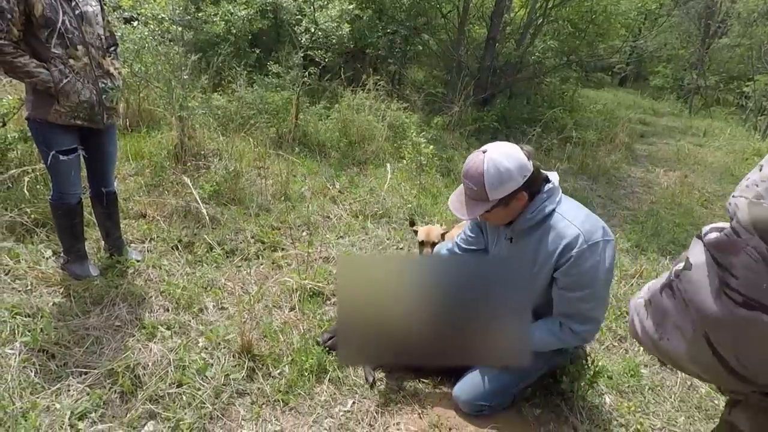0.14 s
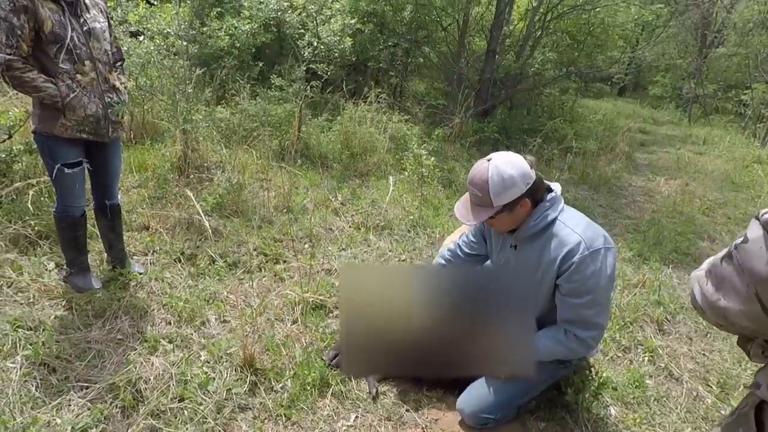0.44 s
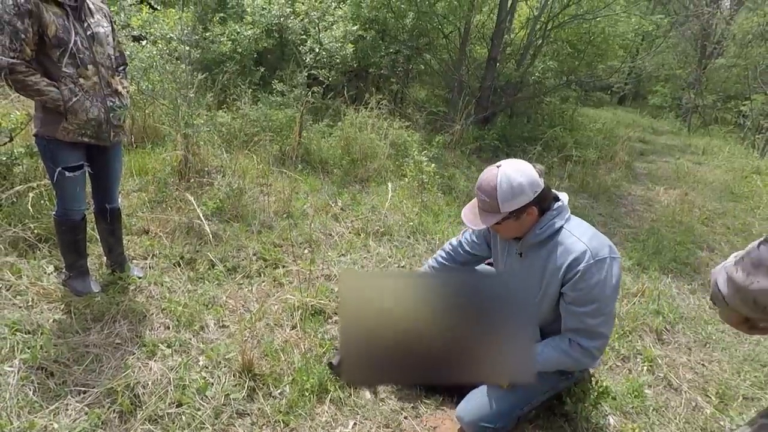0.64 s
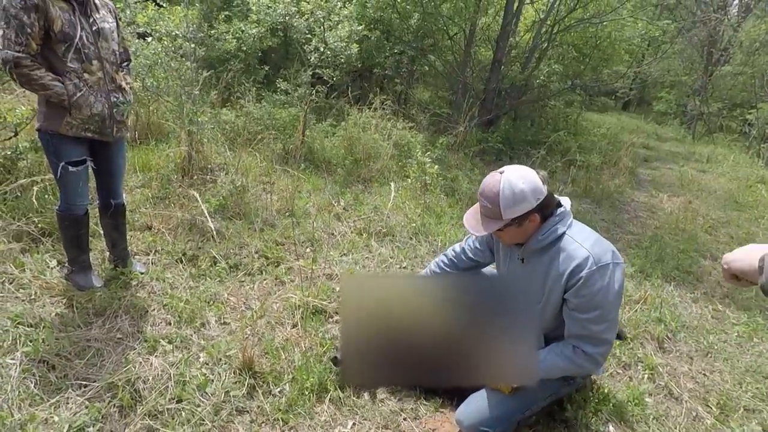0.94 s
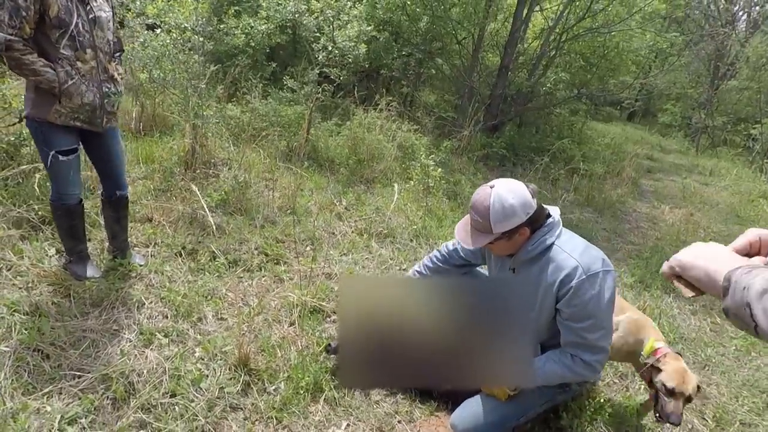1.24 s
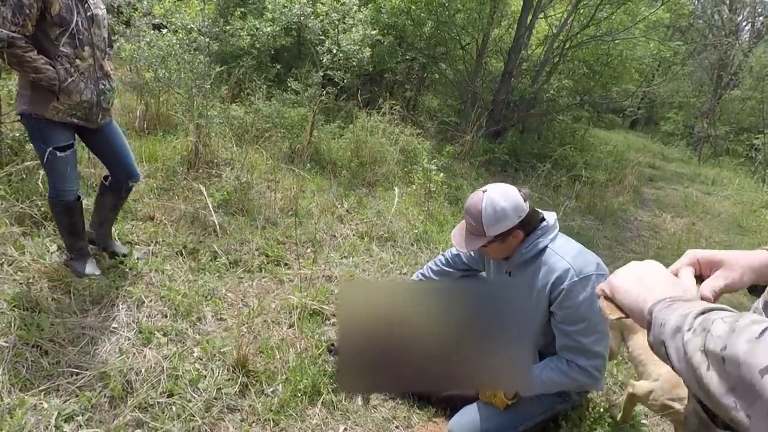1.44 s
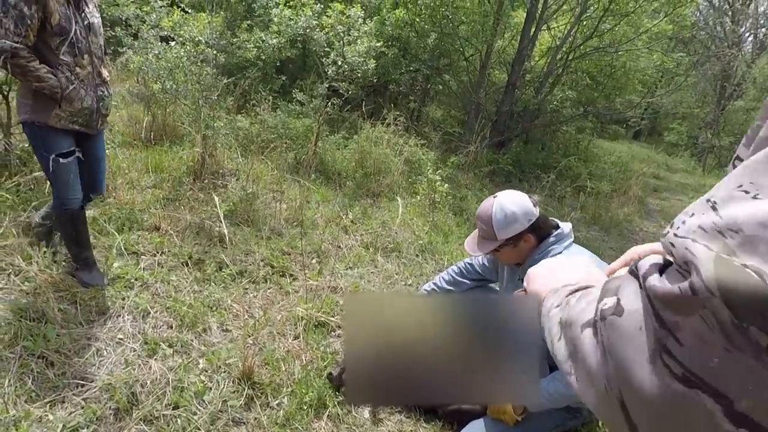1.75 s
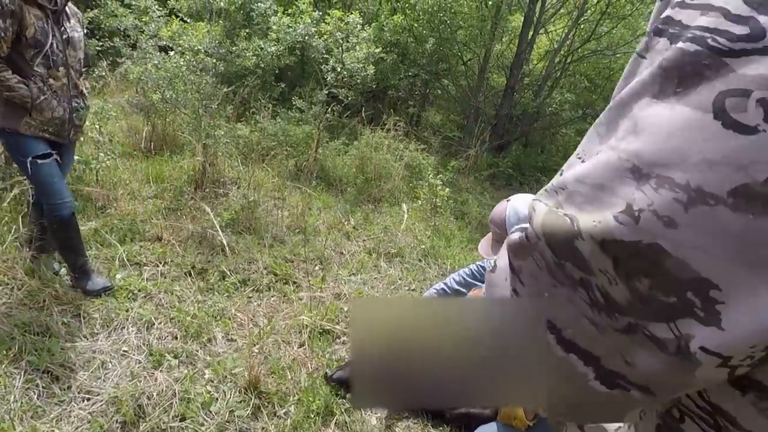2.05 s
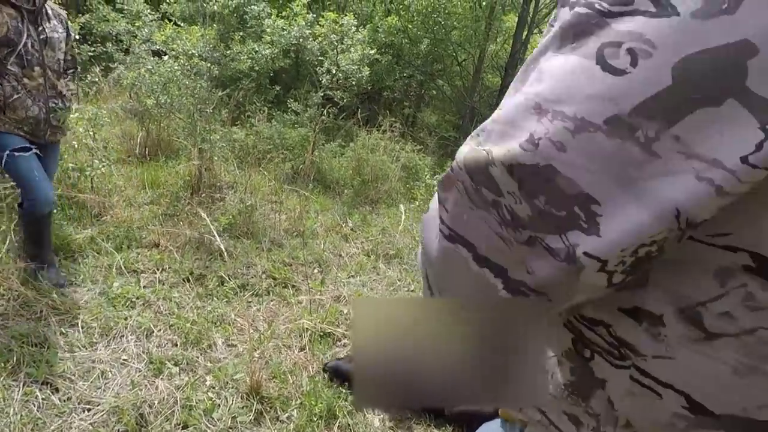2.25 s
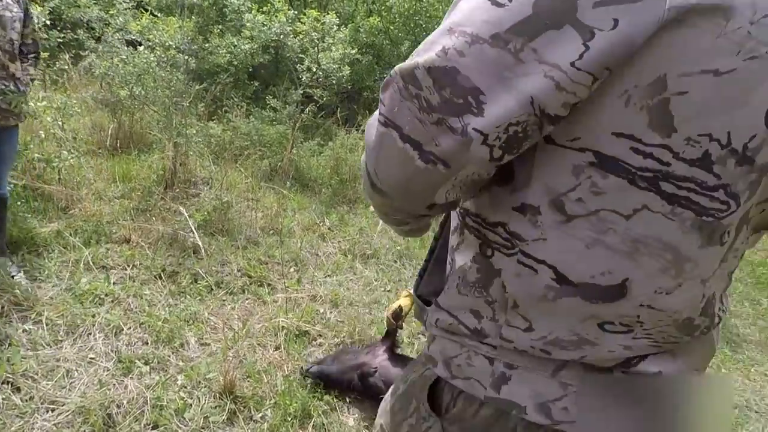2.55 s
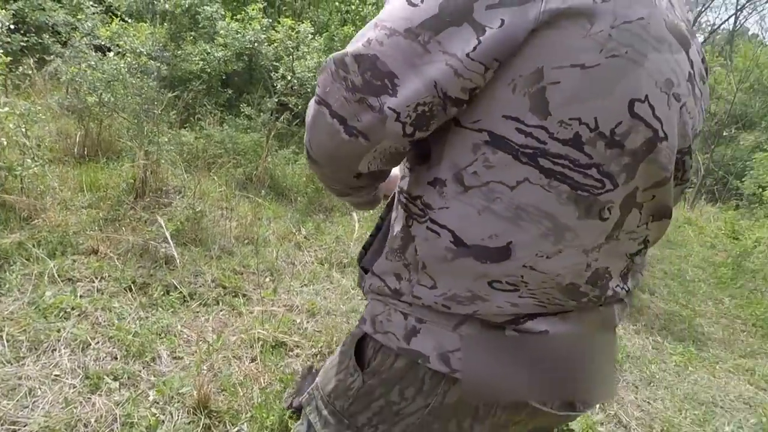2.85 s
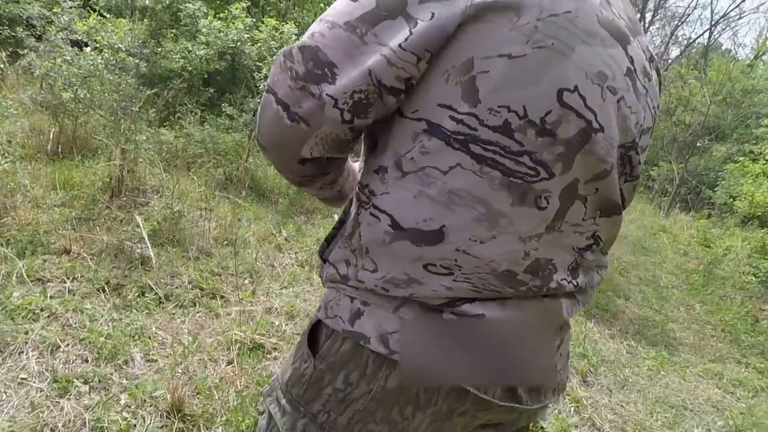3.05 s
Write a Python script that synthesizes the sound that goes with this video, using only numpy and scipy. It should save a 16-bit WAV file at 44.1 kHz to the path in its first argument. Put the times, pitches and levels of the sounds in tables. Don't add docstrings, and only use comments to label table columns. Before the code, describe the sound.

A pinned pig growls into a long, harsh, shrill squeal, then a short squeal and grunts.

```python
import sys
import numpy as np
from scipy import signal
from scipy.fft import rfft, irfft
from scipy.io import wavfile
from scipy.ndimage import uniform_filter1d

SR = 44100
rng = np.random.default_rng(int(sys.argv[2]) if len(sys.argv) > 2 else 0)


def transcribe(signal):
    frames = np.atleast_2d(signal).T
    limited = np.clip(frames, -1, 1)
    pcm = np.round(limited * 32767).astype(np.int16)
    wavfile.write(sys.argv[1], SR, pcm)


def boost(x):
    u = np.asarray(x, float) / 20
    return 10 ** u


N = 141120


def evened(x):
    return x / np.sqrt(np.mean(x ** 2) + 1e-20)


def smooth_noise(shape, size):
    return evened(uniform_filter1d(rng.standard_normal(shape), size=size, axis=0))


def read(points, hz):
    f, value = np.transpose(points)
    return np.interp(np.log(hz + 1), np.log(f + 1), value)


def controls(rows):
    rows = np.array(rows, float)
    start, stop = round(rows[0, 0] * SR), min(round(rows[-1, 0] * SR), N)
    t = np.arange(start, stop) / SR
    return t, [np.interp(t, rows[:, 0], col) for col in rows.T[1:]]


def add(mix, start_s, sound):
    part = mix[round(start_s * SR):][:len(sound)]
    part += sound[:len(part)]


def wash(colour, level, same, patchy_db, flicker_db):
    frames, hz = N // 128 + 5, np.fft.rfftfreq(N, 1 / SR)
    a, b, c, d, patches = rng.standard_normal((frames, 257, 5)).T
    patches = uniform_filter1d(patches, size=8, axis=0)
    patches = evened(uniform_filter1d(patches, size=14, axis=1))
    flicker = smooth_noise(frames, 5)
    left = a + 1j * b
    right = same * left + np.sqrt(1 - same ** 2) * (c + 1j * d)
    z = np.array([left, right]) * boost(patchy_db * patches + flicker_db * flicker)
    x = signal.istft(z, nperseg=512, noverlap=384)[1][:, :N]
    x = irfft(rfft(x) * boost(read(colour, hz)), N)
    return evened(x) * boost(np.interp(np.arange(N) / SR, *np.transpose(level)))


# t/s, level/dB
RUMBLE_LEVEL = [(0, -40), (.7, -40.5), (1.2, -50), (2.0, -51), (2.07, -29), (2.55, -44.5), (2.95, -32),
                (3.2, -43)]
# f/Hz, level/dB
RUMBLE_COLOUR = [(30, 10.5), (95, -63), (125, -10.5), (160, 2.5), (300, -6), (900, -17), (2000, -70)]


def rumble():
    return wash(RUMBLE_COLOUR, RUMBLE_LEVEL, same=0.54, patchy_db=-1.5, flicker_db=2.5)


# t/s, level/dB
RUSTLE_LEVEL = [(0, -49.5), (.1, -39), (.7, -49), (1.5, -52), (1.6, -42.5), (1.701, -57), (2.01, -56),
                (2.064, -39), (2.5, -47), (2.75, -42.5), (3.1, -42.5)]
# f/Hz, level/dB
RUSTLE_COLOUR = [(300, -16), (1100, 3), (2000, 2), (3500, -4.5), (6300, -0.5), (8500, -11), (12000, -22.5),
                 (15000, -17)]


def rustle():
    return wash(RUSTLE_COLOUR, RUSTLE_LEVEL, same=.3, patchy_db=1.6, flicker_db=2.5)


# t/s, peak level/dB
KNOCKS = [(1.781, -34), (1.939, -35.5), (2.573, -36.5), (2.62, -38), (2.643, -28.5)]
# t/s, peak level/dB
THUMPS = [(0.039, -24.5), (0.789, -25), (0.894, -29.5), (2.022, -32.5)]


def knocks():
    out, t = np.zeros(N), np.arange(2200) / SR
    for rows, bright in ((KNOCKS, 1), (THUMPS, .1)):
        turns = np.cumsum(190 + 1300 * bright * np.exp(-t / 0.00083)) / SR
        push = np.sin(2 * np.pi * turns) * np.exp(-t / 0.0086)
        for s, db in rows:
            add(out, s + 0.00228, boost(db) * push)
    return out


# t/s, peak level/dB
TWIGS = [(2.736, -24.5), (2.779, -30.5), (2.79, -40), (3.105, -29)]


def twigs():
    out, t = np.zeros(N), np.arange(2200) / SR
    band = signal.butter(1, [1500, 9000], "bandpass", fs=SR)
    for s, db in TWIGS:
        noise = signal.lfilter(*band, rng.standard_normal(len(t)))
        add(out, s, 0.87 * boost(db) * noise * np.exp(-t / 0.0032))
    return out


ECHO_DB, ECHO_S, BRUSH_DB, BRUSH_T60_S = -26.5, 0.043, -24.5, 0.54


def brush(x):
    t = np.arange(SR) / SR
    sparse = rng.random((SR, 2)).T < .05
    taps = rng.standard_normal((SR, 2)).T * sparse * (t > .004)
    tail = taps * boost(-60 * t / BRUSH_T60_S)
    echo = taps * np.exp(-((t - ECHO_S) / 0.11) ** 4)
    both = boost(BRUSH_DB) * tail / np.linalg.norm(tail[0])
    both += boost(ECHO_DB) * echo / np.linalg.norm(echo[0])
    both = signal.lfilter(*signal.butter(1, 6000, fs=SR), both)
    return signal.fftconvolve(x[None], both, axes=1)[:, :N]


# f/Hz, lead/rad
LEAD = [(0, 0), (700, -.5), (1380, -4.4), (1980, -5.0), (2410, -1.8), (2800, .1), (5200, -.7), (6900, .6),
        (7490, 3.3), (10000, 5.5)]
# f/Hz, level/dB
TILT = [(300, 1), (1100, -13), (2200, 7.5), (2800, -4.5), (4200, 1), (5800, -7.5), (6900, 7), (8600, -14.5)]


def ports(x):
    hz = np.fft.rfftfreq(N, 1 / SR)
    half = np.exp(.5j * read(LEAD, hz)) * boost(read(TILT, hz) / 2)
    return irfft(rfft(x) * np.array([half, 1 / half]), N)


# t/s, click level/dB, chest ring level/dB
SLAPS = [(2.027, -45, -35), (2.043, -37, -39), (2.063, -26, -29), (2.081, -28, -27), (2.100, -23, -24),
         (2.120, -22, -28), (2.138, -23, -22), (2.157, -28, -25), (2.173, -29, -21.5),
         (2.189, -16.5, -22.5), (2.200, -19.5, -23.5), (2.210, -20, -18.5), (2.216, -20, -33),
         (2.3918, -30, -45), (2.4097, -31, -49), (2.429, -34, -49), (2.4691, -28.5, -49),
         (2.908, -28, -29.5), (2.914, -30.5, -39), (2.931, -8.5, -24), (2.949, -10.5, -23.5),
         (2.967, -21.5, -18), (2.986, -22.5, -29.5)]
# f/Hz, level/dB, t60/s
CHEST = [(960, 1, 0.026), (520, -3, 0.024), (261, -4.5, 0.037)]


def chest():
    out, t = np.zeros(N), np.arange(2600) / SR
    onset = np.minimum(t / 0.0016, 1)
    for s, _, slap_db in SLAPS:
        for hz, db, t60_s in CHEST:
            shifted_hz = hz * rng.uniform(0.894, 1.098)
            decay = boost(slap_db + db - 60 * t / t60_s)
            add(out, s, decay * np.sin(2 * np.pi * shifted_hz * t) * onset)
    return out


def resonate(x, hz, width):
    turn, r = np.exp(2j * np.pi * np.cumsum(hz) / SR), np.exp(-np.pi * width / SR)
    low = signal.lfilter([(1 - r) ** 2], [1, -2 * r, r * r], x / turn + 1e-18)
    return 2 * (turn * low).real


# f/Hz, level/dB
GRUNT = [(263, -4.5), (947, 3.5), (2130, -9.5), (3160, 5), (4500, 5.5), (5680, -9), (6750, -14),
         (8300, -63), (547, -3.5), (3800, -11)]
OPENING = [(546, -74), (1010, -16), (2250, -1.5), (3220, -5), (4690, -2.5), (5770, -0.5), (7550, -9),
           (8200, -35), (2800, -19), (3660, 0.5)]
WIDE = [(560, -33.5), (940, -8.5), (2158, -3.5), (3050, 2), (4630, 3.5), (5720, -10), (6850, -8),
        (8260, -18.5), (2470, -3.5), (3810, -15)]
PINCHED = [(620, -64.5), (957, -14), (2245, -4), (2851, 2), (5043, -5.5), (5850, -11), (7610, -12.5),
           (9400, -39), (2340, -2), (3510, -11)]
STRAINED = [(400, -26), (939.4, -14.5), (1950, -1), (3070, -0.5), (4200, -13), (5165, -3), (6370, -3.5),
            (8270, -10.5), (2452, -5), (3720, -7.5)]
CLOSING = [(400, -30), (967, 3.5), (1283, -10), (3030, 3.5), (3956, -6), (4900, -4), (6000, -8.5),
           (8020, -9), (1990, 3.5), (3430, -8)]
MUTTER = [(295, 7.5), (910, 10.5), (1600, 5.5), (2370, 8.5), (3900, 0), (4740, 4.5), (6200, -1),
          (8500, -40), (600, -5), (5240, 4)]
YELP = [(520, -16), (972, -0.5), (1930, 7.5), (2610, 2.5), (4410, 11), (5180, 5), (6310, -1), (7700, -16),
        (2280, -0.5), (3730, 3.5)]
PANT = [(297, -3), (950, -16), (1880, 8.5), (3210, 8.5), (3800, 8), (5050, -2.5), (6740, -6), (8550, -36),
        (2400, 1), (4540, -14)]
MOUTH = [GRUNT, OPENING, WIDE, WIDE, PINCHED, PINCHED, STRAINED, STRAINED, CLOSING, MUTTER, MUTTER,
         YELP, YELP, CLOSING, PANT, PANT, GRUNT, GRUNT, PANT]
MOUTH_S = [0.064, 0.126, .165, .56, .63, .76, .81, 1.525, 1.585, 1.9, 2.165, 2.188, 2.335, 2.369, 2.39, 2.6,
           2.8, 2.97, 3.0]
SIGNS = [1, -1, 1, 1, 1, -1, 1, -1, -1, -1]
WIDTH_HZ = [235, 285, 454, 562, 560, 840, 850, 1500, 400, 497]
# t/s, f/Hz, depth/0-1
NOTCH = [(.1, 1500, 0.5), (.3, 1540, 0.6), (.58, 1546, 1), (.65, 4730, 0.4), (.78, 3800, 0.5),
         (.8, 4900, 0.5), (.86, 4780, 1), (1.5, 4900, 0.3), (2.1, 2400, 0.2), (2.17, 2500, 1),
         (2.25, 3050, 0.8), (2.33, 3800, 0.8), (2.4, 2400, .5)]
NOTCH_WIDTH_HZ, WANDER_SHARE, WANDER_DB = 700, .012, 1.5
SKIRT_DB, SKIRT_HZ = -33, 9500


def throat(drive, t):
    shapes = np.array(MOUTH, float)
    skirt = signal.butter(1, [1500, SKIRT_HZ], "bandpass", fs=SR)
    out = boost(SKIRT_DB) * signal.lfilter(*skirt, drive)
    drift = uniform_filter1d(rng.standard_normal((len(t), shapes.shape[1], 2)), size=1800, axis=0)
    drift = evened(uniform_filter1d(drift, size=900, axis=0))
    for k in range(shapes.shape[1]):
        hz, db = (np.interp(t, MOUTH_S, shapes[:, k, col]) for col in (0, 1))
        hz = hz * (1 + WANDER_SHARE * drift[:, k, 1])
        gain = SIGNS[k] * boost(db + WANDER_DB * drift[:, k, 0])
        out += gain * resonate(drive, hz, WIDTH_HZ[k])
    notch_s, notch_hz, depth = np.transpose(NOTCH)
    hz, depth = np.interp(t, notch_s, notch_hz), np.interp(t, notch_s, depth)
    return out - np.clip(depth, 0, 1) * resonate(out, hz, NOTCH_WIDTH_HZ)


# t/s, slap rate/Hz, slap level/dB, breath level/dB
GROWLS = [
    [(.005, 34.3, -31, -73), (.027, 50, -15.5, -99), (.045, 220, -25, -46), (.075, 246, -15.5, -27)],
    [(2.0252, 49, -64, -80), (2.063, 54, -60, -41), (2.16, 37, -63.5, -39), (2.186, 79, -60, -42),
     (2.205, 90, -60, -44), (2.225, 170, -59.5, -46)],
    [(2.372, 27, -46, -30), (2.41, 63, -56, -35), (2.5, 58, -41, -44), (2.53, 61, -61, -55)],
    [(2.9, 41, -59, -62), (2.93, 60, -60, -36), (2.949, 59, -60.5, -39.5), (2.987, 54, -43, -40),
     (3.02, 38, -48, -38), (3.11, 35, -46, -41.5), (3.15, 44, -48, -59)],
]
SNAP_DB = -18.5


def growl(rows):
    t, (rate_hz, slap_db, breath_db) = controls(rows)
    turns = np.cumsum(rate_hz) / SR
    air, breath, size_db, chance = rng.standard_normal((len(t), 4)).T
    beats = np.diff(np.floor(turns), prepend=-1)
    slaps = (beats + 0.064 * (chance > 3.0)) * boost(slap_db + size_db)
    for s, db, _ in SLAPS:
        slaps[abs(t - s) < .5 / SR] += boost(db)
    puffs = signal.oaconvolve(slaps, np.exp(-np.arange(300) / 20))[:len(t)]
    drive = 2 * slaps + .2 * air * puffs
    snap = boost(SNAP_DB) * signal.lfilter(*signal.butter(2, [1800, 7000], "bandpass", fs=SR), drive)
    breath = (.5 + np.exp(-(turns % 1) / 0.9)) * breath
    return t[0], 4.77 * (throat(drive, t) + snap) + boost(breath_db) * evened(throat(breath, t))


def steady(x):
    return x / np.sqrt(abs(uniform_filter1d(x ** 2, size=1500)) + 1e-12)


# t/s, whistle f/Hz, folds f/Hz, level/dB
LONG = [(.062, 1806, 523.4, -33.5), (.08, 1820, 540.3, -17.5), (.13, 1849, 556.3, -17.5),
        (.195, 2014, 560, -17.5), (.4, 1950, 548.7, -16), (.6, 2121, 623, -13.5), (.7, 2224, 646.4, -13.5),
        (.78, 2279, 602.5, -15.5), (.878, 2232, 575, -17.5), (.95, 2227, 578.6, -16.5),
        (1.02, 2185, 576.5, -17), (1.31, 2184, 575, -16.5), (1.468, 2149, 579.2, -15.5),
        (1.51, 2204, 585.2, -14), (1.53, 2124, 562, -15.5), (1.55, 1898, 520, -16),
        (1.59, 1141, 400, -41.5)]
# (t/s, f/Hz, f/Hz, level/dB)
SHORT = [(2.212, 1500, 394, -19), (2.224, 1623, 490.2, -14.5), (2.272, 1788, 523.3, -17),
         (2.311, 1834, 526, -15.5), (2.341, 1666, 494, -16), (2.37, 1006, 384, -30)]
# t/s, noise share/0-1
HOARSE = [(.07, .88), (.17, .52), (.66, .6), (.82, .44), (1.48, .42), (1.535, .25), (2.22, .85), (2.3, .66)]
# t/s, share/0-1
LIMP = [(.62, 0.17), (.78, 0.46), (1.5, 0.51), (1.535, 0.03)]
WHISTLE_TILT_DB, BEAT_DEPTH, JITTER, PUFF = -1.8, 1.7, .003, .8
SHIMMER, FOLD_TONE = .3, 0.73


def squeal(rows):
    t, (whistle_hz, folds_hz, db) = controls(rows)
    rough = np.interp(t, *np.transpose(HOARSE))
    sub = np.interp(t, *np.transpose(LIMP))
    wobble = smooth_noise((len(t), 2), 250).T
    fast = 2 * np.pi * np.cumsum(whistle_hz * (1 + JITTER * wobble[0])) / SR
    slow = 2 * np.pi * np.cumsum(folds_hz * (1 + 3 * JITTER * wobble[1])) / SR
    flutter = smooth_noise((len(t), 6), 120).T
    sway = rough * SHIMMER * flutter[0]
    sway += 0.61 * rough * np.sin(slow + 1) + 1.47 * sub * np.sin(slow / 2 + 2)
    whistle = np.zeros(len(t))
    for k in range(1, 6):
        whistle += boost(WHISTLE_TILT_DB * k) * (1 + SHIMMER * flutter[k]) * np.cos(k * (fast + sway))
    opening = (1 - .6 * sub) * np.cos(slow) + .9 * sub * np.cos(slow / 2)
    beat = np.exp(BEAT_DEPTH * np.sqrt(rough / 2) * opening)
    air = (PUFF + beat) * rng.standard_normal(len(t))
    air = signal.sosfilt(signal.butter(4, 780, "highpass", fs=SR, output="sos"), air)
    broken = evened(uniform_filter1d(flutter[0], size=900))
    fold_tone = FOLD_TONE * (1 + 0.34 * broken) * (beat - beat.mean())
    voiced = evened(whistle * beat) + fold_tone
    drive = (1 - rough) * voiced + rough * evened(air)
    return t[0], boost(db) * steady(throat(drive, t))


def scene():
    pig = chest()
    for rows in GROWLS:
        add(pig, *growl(rows))
    for rows in (LONG, SHORT):
        add(pig, *squeal(rows))
    return rumble() + rustle() + knocks() + twigs() + brush(pig) + ports(pig)


def top_cut(x):
    return signal.sosfilt(signal.butter(12, 15760, fs=SR, output="sos"), x)


CEILING, WIND_LEAK_DB = 0.82, -34.0


def record(dry):
    cut = signal.sosfilt(signal.butter(6, 118, "highpass", fs=SR, output="sos"), dry)
    held = CEILING * np.tanh((cut + boost(WIND_LEAK_DB) * dry) / CEILING)
    held = signal.sosfilt(signal.cheby2(10, 60, 15750, fs=SR, output="sos"), held)
    return top_cut(held)


dry = scene()
out = record(dry)
transcribe(out)
```